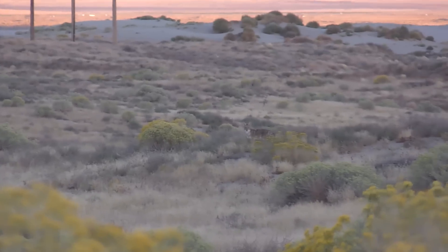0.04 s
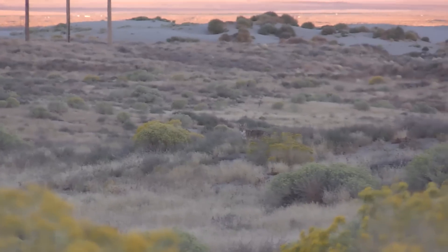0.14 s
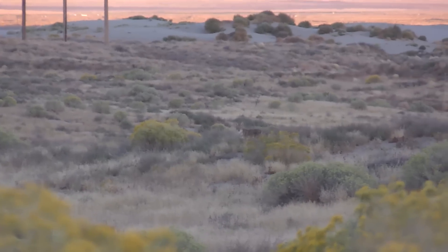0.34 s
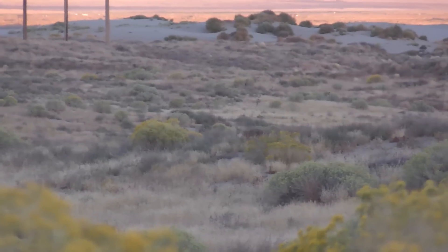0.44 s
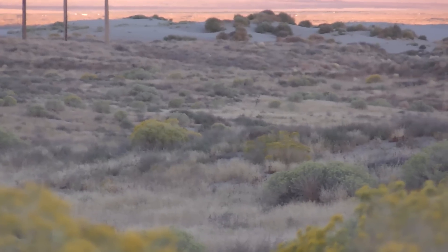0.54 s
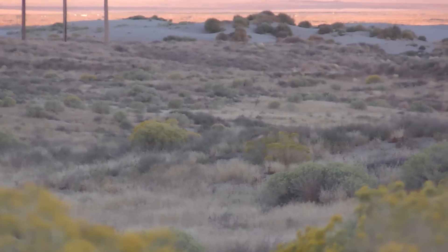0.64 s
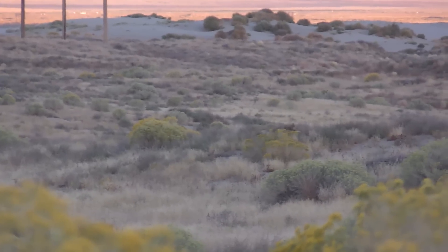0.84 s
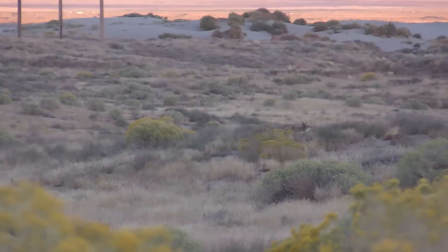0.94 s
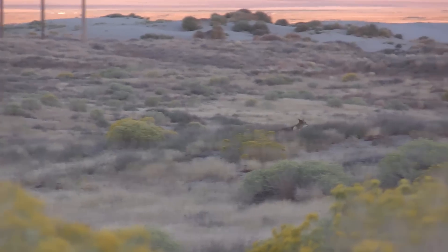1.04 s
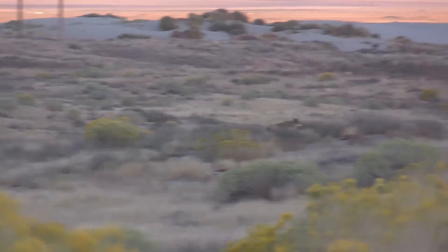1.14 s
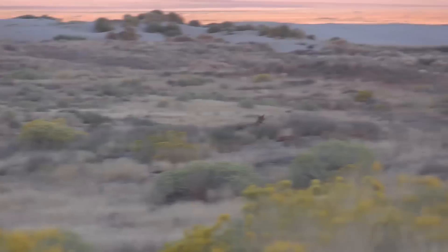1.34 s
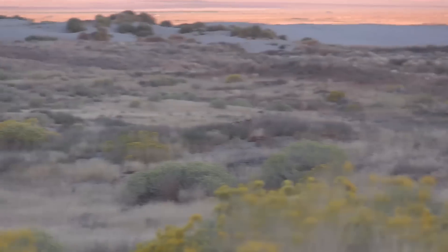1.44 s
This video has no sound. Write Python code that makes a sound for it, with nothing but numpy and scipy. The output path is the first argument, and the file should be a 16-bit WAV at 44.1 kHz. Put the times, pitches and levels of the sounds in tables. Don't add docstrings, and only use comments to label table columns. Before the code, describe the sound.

A single muffled rifle shot close to a small camera microphone in open scrubland, overloaded and thumpy, followed by hissy scatter and low rolling echoes, then faint wind, dry handling ticks and a growing cloth rustle.

```python
import sys
import numpy as np
from scipy import signal
from scipy.fft import rfft, irfft, next_fast_len
from scipy.io import wavfile
from scipy.ndimage import uniform_filter1d, map_coordinates

SR = 44100
rng = np.random.default_rng(int(sys.argv[2]) if len(sys.argv) > 2 else 0)


def convert_level_to_amplitude(level_db):
    exponent = np.asarray(level_db, float) / 20
    return 10 ** exponent


def to_wav(s):
    ch = np.atleast_2d(s).T
    pcm = np.round(np.clip(ch, -1, 1) * 32767)
    wavfile.write(sys.argv[1], SR, pcm.astype(np.int16))


N = 66150
SHOT_S = 0.2383


def unit(x):
    return x / np.sqrt(np.mean(x ** 2) + 1e-20)


def along(points, hz):
    f, v = np.transpose(points)
    return np.interp(np.log(hz + 1), np.log(f + 1), v)


def curve(rows):
    s, db = np.transpose(rows)
    return np.interp(np.arange(N) / SR, s, db, left=-120)


def wobble(rate):
    knots = rng.standard_normal(int(N * rate / SR) + 4)
    return map_coordinates(knots, [np.arange(N) * rate / SR])


def shape(start, rise, hold, t60):
    t = np.arange(N) / SR - start
    decay = convert_level_to_amplitude(-60 * np.clip(t - rise - hold, 0, None) / t60)
    return np.clip(t / rise, 0, 1) ** 2 * decay


def filtered(x, response):
    m = next_fast_len(N + 8192)
    return irfft(rfft(x, m) * response(np.fft.rfftfreq(m, 1 / SR)), m)[..., :N]


def hiss(spectrum, patchy_db, air_db=0, crackle_db=0, near_s=SHOT_S):
    raw = rng.standard_normal(N) * convert_level_to_amplitude(crackle_db * wobble(900))
    raw = unit(filtered(raw, lambda hz: convert_level_to_amplitude(along(spectrum, hz))))
    hz, t, z = signal.stft(raw, SR, nperseg=512)
    patches = uniform_filter1d(rng.standard_normal(z.shape), 6, 0)
    patches = unit(uniform_filter1d(patches, 3, 1))
    travel = np.clip(np.abs(t - near_s), 0, 0.5)
    loss = air_db * np.outer(hz / 1000 - 4, travel)
    return signal.istft(z * convert_level_to_amplitude(patchy_db * patches - loss), SR, nperseg=512)[1][:N]


def grains(s, db, hz, cycles):
    t = np.arange(SR // 16) / SR
    u = np.outer(hz / np.asarray(cycles), t)
    swell = np.e * u * np.exp(-u)
    waves = convert_level_to_amplitude(db)[:, None] * swell * np.sin(2 * np.pi * np.outer(hz, t))
    at = np.round(np.asarray(s) * SR).astype(int)[:, None] + np.arange(len(t))
    return np.bincount(at.ravel(), waves.ravel(), N + SR)[:N]


# f/Hz, level/dB [per Hz]
WIND_COLOUR = [(25, -14), (55, 1.5), (130, 0.5), (230, -3), (450, -11), (1000, -16.5), (4000, -26),
               (16000, -34)]


def wind_floor():
    floor_db, duck_db, after_db, recover_s = -56.5, -5.5, 2, 0.6
    t = np.arange(N) / SR - SHOT_S
    gain_db = (duck_db * np.exp(-(t / recover_s) ** 4) + after_db) * (t > 0)
    return convert_level_to_amplitude(floor_db + gain_db + 0.81 * wobble(9.3)) * hiss(WIND_COLOUR, 0.88)


# t/s, level/dB
CLOTH_SWELL = [(1.2, -72.5), (1.3, -65), (1.36, -54), (1.41, -46), (1.46, -45.5), (1.5, -42.5)]
# f/Hz, level/dB [per Hz]
CLOTH_COLOUR = [(40, -15), (100, -6), (300, -3.5), (600, -6), (1000, -11), (2700, -11), (7000, -18),
                (16000, -27.5)]


def cloth():
    level = convert_level_to_amplitude(curve(CLOTH_SWELL) + 1.0 + 0.58 * wobble(59.4))
    brightens = 4
    return level * hiss(CLOTH_COLOUR, 0.93, air_db=brightens, crackle_db=2.0, near_s=1.484)


# f/Hz, level/dB [per Hz]
STRAP_COLOUR = [(800, -33), (1200, 7.5), (1450, 2), (1750, -5), (2400, -30)]


def strap():
    return convert_level_to_amplitude(-58.5) * shape(1.237, 0.071, 0.11, 0.25) * hiss(STRAP_COLOUR, 2.7, crackle_db=-1.5)


# t/s, level/dB [peak], f/Hz
TICK_HITS = [(.557, -48, 4940), (.62, -55, 6455), (0.7624, -51, 6440), (0.8451, -47, 3730),
             (.851, -48.5, 6500), (.879, -55, 4980), (.98, -49, 4300), (1.027, -54.5, 5240),
             (1.125, -57, 4030), (1.2, -49, 6850), (1.361, -42, 3300), (1.387, -43, 4000),
             (1.4225, -38, 3380), (1.481, -32, 10900), (1.486, -53, 5000)]
# t/s, level/dB [peak], f/Hz
CREAK_RINGS = [
    (.465, -38, 2000),
    (1.307, -48, 1510),
    (1.33, -46.5, 1320),
]


def handling():
    bump = -grains([0.799], [-40], [57], 0.5)
    s, db, hz = np.transpose(TICK_HITS)
    ticks = grains(s, db, hz, 0.72)
    rebounds = grains(s + 0.00068, db - 9, hz * 1.3, 0.74)
    s, db, hz = np.transpose(CREAK_RINGS)
    creaks = grains(s, db, hz, 2.4)
    return bump + ticks + rebounds + creaks


# t/s, hold/s, level/dB
SLOPE_ANSWERS = [
    (0.388, .012, -47),
    (0.433, 0.03, -51.5),
    (0.831, 0.056, -56.5),
]
# f/Hz, level/dB [per Hz]
SLOPE_COLOUR = [(500, -7), (1000, -4), (1500, 2.5), (2100, 4), (3200, -7.5), (7000, -43.5)]


def far_slopes():
    level = sum(convert_level_to_amplitude(db) * shape(s, 0.017, hold, 0.2) for s, hold, db in SLOPE_ANSWERS)
    return level * hiss(SLOPE_COLOUR, 1.9)


# t/s, level/dB
GROUND_ROLL = [(.275, -19), (.293, -21), (.351, -23.5), (.409, -30.5), (.5, -38.5), (.613, -46.5),
               (.8, -46.5), (.9, -50.5), (1.1, -53), (1.3, -58.5)]
# t/s, level/dB [peak], f/Hz
GROUND_THUDS = [(0.2922, -17, 296), (0.301, -14.5, 330), (0.3135, -18, 299), (.322, -16.5, 296),
                (0.327, -19, 300), (0.341, -18, 305), (0.352, -23, 273), (.358, -24, 308), (.369, -26, 264),
                (0.374, -25, 253), (.391, -26, 243), (.405, -37, 99.5), (0.431, -31, 330),
                (.445, -32.5, 191), (0.474, -34, 300), (.508, -34, 160.4), (0.533, -35.5, 170.5),
                (0.571, -42, 266), (.595, -44, 133), (.632, -42, 119.8), (0.654, -44, 168.4),
                (.745, -44.5, 170), (.757, -44, 128.6)]


def ground():
    draw = rng.random((900, 3))
    s = draw[:, 0] * N / SR
    near_hz, far_hz, sink_s = 330, 125, 0.33
    pitch = far_hz + (near_hz - far_hz) * np.exp(-np.abs(s - SHOT_S) / sink_s)
    spread = np.exp(1.3 * (draw[:, 1] - 0.5))
    roll = grains(s, -2 * np.log(draw[:, 2]), pitch * spread, 0.86)
    power = np.abs(uniform_filter1d(roll ** 2, size=2000))
    roll = roll / np.sqrt(power + 1e-9) * convert_level_to_amplitude(curve(GROUND_ROLL) - 5.5)
    s, db, hz = np.transpose(GROUND_THUDS)
    thuds = grains(s, db, hz, 0.31 + 1.9 * (s - SHOT_S))
    edges = grains(s, db - 8.5, 2.5 * hz, 0.77)
    low_cut_hz = 90
    return filtered(roll + thuds + edges, lambda f: 1 / (1 + (low_cut_hz / (f + 1)) ** 3))


# t/s, level/dB
BRUSH_DECAY = [(.262, -25.5), (.336, -28), (.36, -36.5), (.39, -41), (.43, -48.5), (.47, -50), (.51, -57),
               (.62, -60.5), (.7, -65.5), (.78, -66), (.82, -69), (.85, -60), (.9, -67), (1.0, -72.5)]
# f/Hz, level/dB [per Hz]
BRUSH_COLOUR = [(250, -17.5), (500, -4), (800, -13.5), (1300, -7.5), (2100, -7), (5000, -5.5), (7500, -7.5),
                (16000, -15.5)]


def brush():
    level = convert_level_to_amplitude(curve(BRUSH_DECAY) + 2.0 + 0.64 * wobble(70))
    return level * hiss(BRUSH_COLOUR, 2.1, air_db=7.5, crackle_db=0.5)


# t/s, level/dB
BUSH_ANSWERS = [(0.264, -25), (.283, -20), (0.292, -26.5), (.3, -23.5), (0.313, -20), (0.329, -30.5),
                (0.34, -27), (.375, -38), (.391, -42.5)]
# f/Hz, level/dB [per Hz]
TWIG_COLOUR = [(1500, -23), (4000, -2.5), (6500, 3), (10000, -7), (16000, -17)]


def near_bushes():
    t, puff_s = np.arange(N) / SR, 0.002
    level = sum(convert_level_to_amplitude(db) * np.exp(-((t - s) / puff_s) ** 2) for s, db in BUSH_ANSWERS)
    return level * hiss(TWIG_COLOUR, 1.5)


# f/Hz, level/dB [per Hz]
GAS_COLOUR = [(290, -22), (500, -8), (1160, -7), (1340, -5), (1460, -10.5), (3290, -12), (10100, -19),
              (16000, -27.5)]


def shot():
    t = np.clip(np.arange(N) / SR - SHOT_S, 0, None)
    fall_s, body_hz, extra_hz = 0.0061, 370, 570
    high = np.exp(-(t / fall_s) ** 6) * (t > 0)
    turns = body_hz * t + extra_hz * np.cumsum(high) / SR
    whoop_db, body_db = -10.5, -6.5
    level = convert_level_to_amplitude(body_db + (whoop_db - body_db) * high) * shape(SHOT_S, 0.0018, 0.0079, 0.023)
    rasp = convert_level_to_amplitude(-7.5) * high * np.sin(2 * np.pi * 2620 * t)
    whoop = level * (np.sin(2 * np.pi * turns) + rasp)

    thump_late_s, thump_hz = 0.0019, 135
    thump = convert_level_to_amplitude(-14.5) * shape(SHOT_S + thump_late_s, 0.0019, 0.01136, 0.024)
    thump = thump * np.sin(2 * np.pi * thump_hz * (t - thump_late_s))
    push = grains([SHOT_S + 0.0024], [-29.5], [62], 0.52)
    gas = convert_level_to_amplitude(-11.5) * shape(SHOT_S - 0.0011, 0.0037, 0.0044, 0.091)
    gas = gas * hiss(GAS_COLOUR, 1.5, crackle_db=-0.5)
    return whoop + thump + push + gas


def scene():
    camera = cloth() + strap() + handling()
    land = far_slopes() + ground() + brush() + near_bushes()
    return (wind_floor() + camera + land + shot())[None]


def band_limit(x):
    return signal.sosfilt(signal.butter(12, 16490, fs=SR, output="sos"), x)


def record(dry):
    ceiling, knee, top_hz = 0.62, 6, 15740
    x = dry / (1 + np.abs(dry / ceiling) ** knee) ** (1 / knee)
    x = filtered(x, lambda hz: 1 / (1 + (hz / top_hz) ** 400))
    return band_limit(x)


dry = scene()
out = record(dry)
to_wav(out)
```